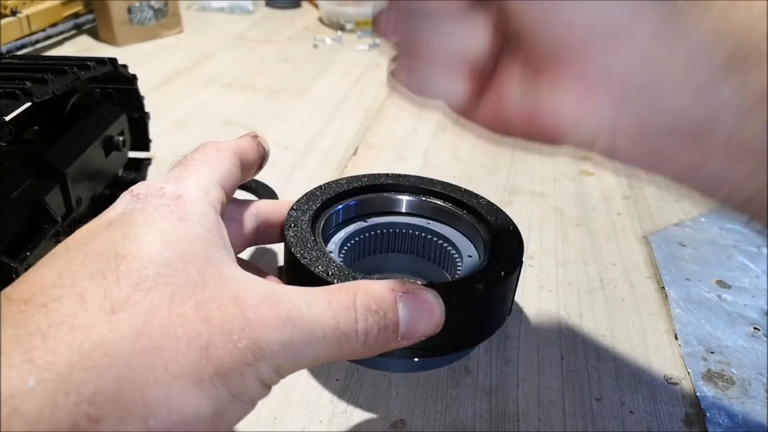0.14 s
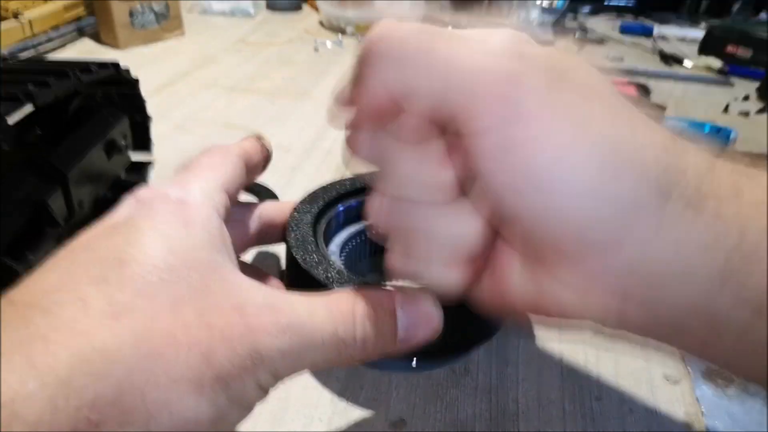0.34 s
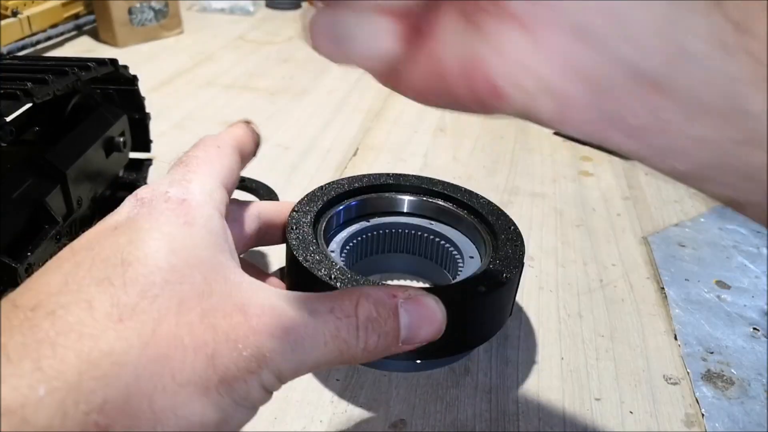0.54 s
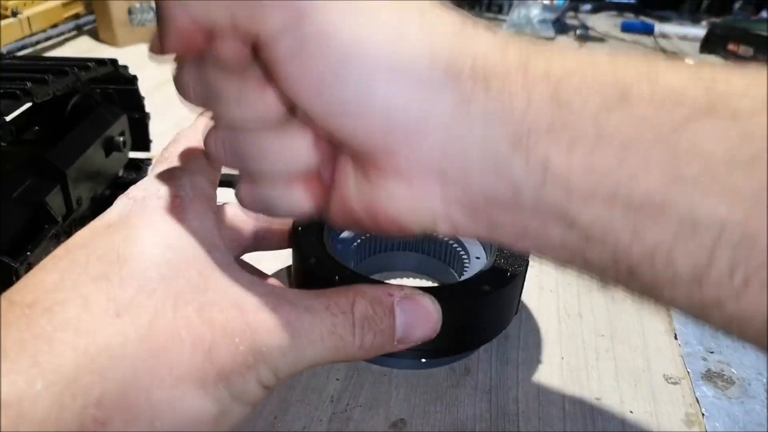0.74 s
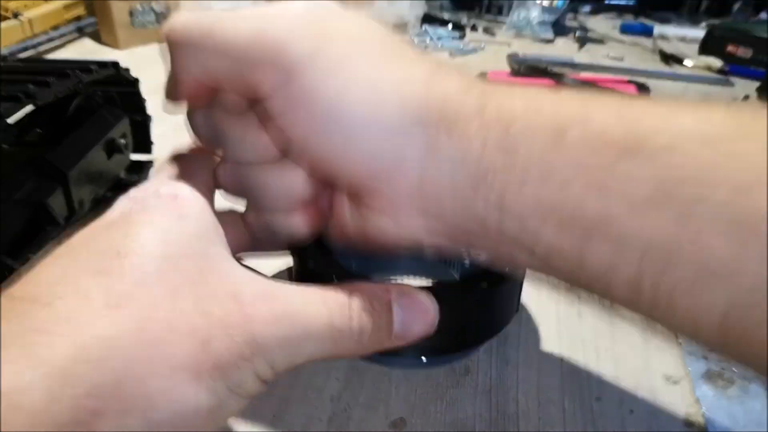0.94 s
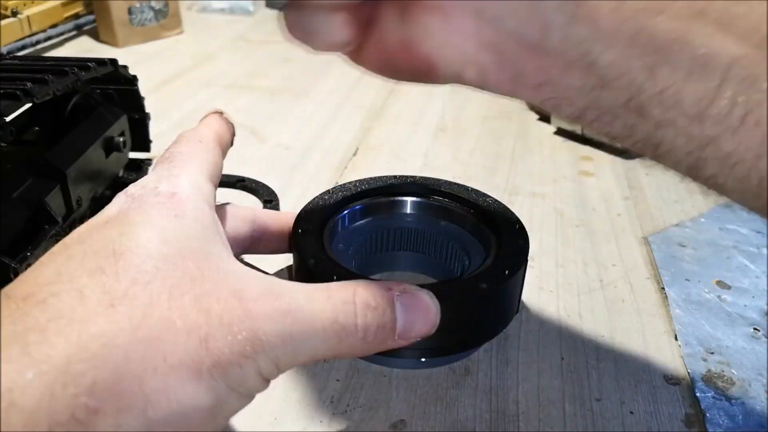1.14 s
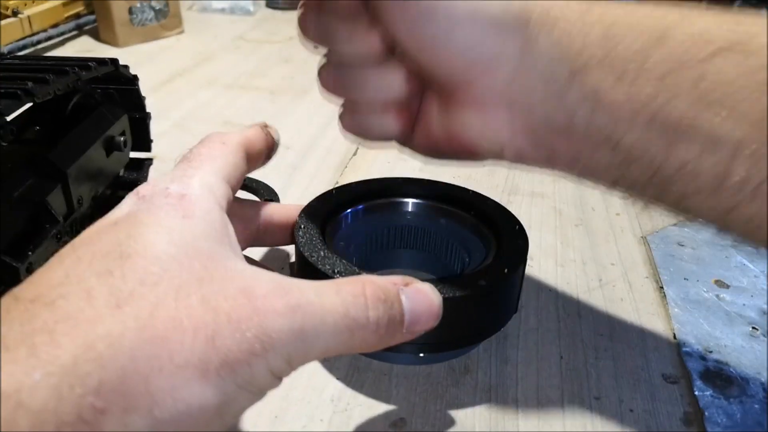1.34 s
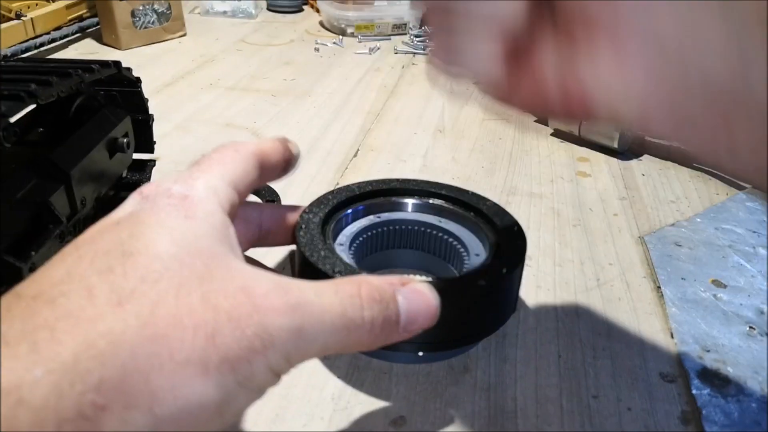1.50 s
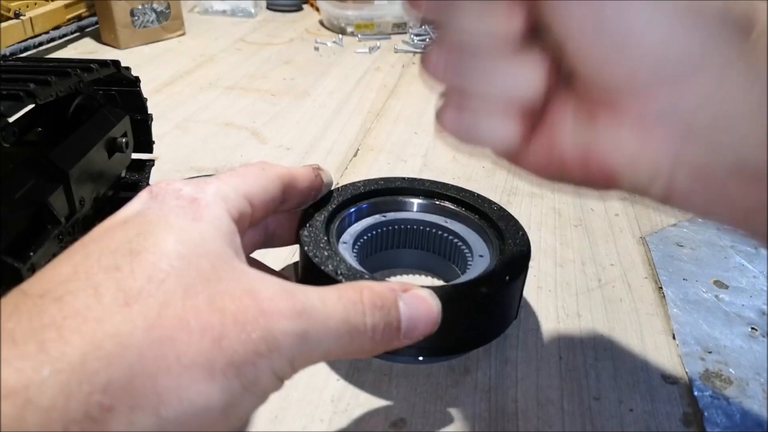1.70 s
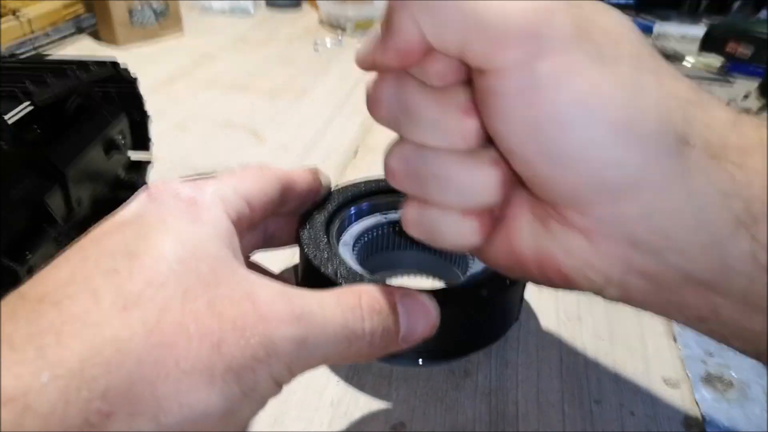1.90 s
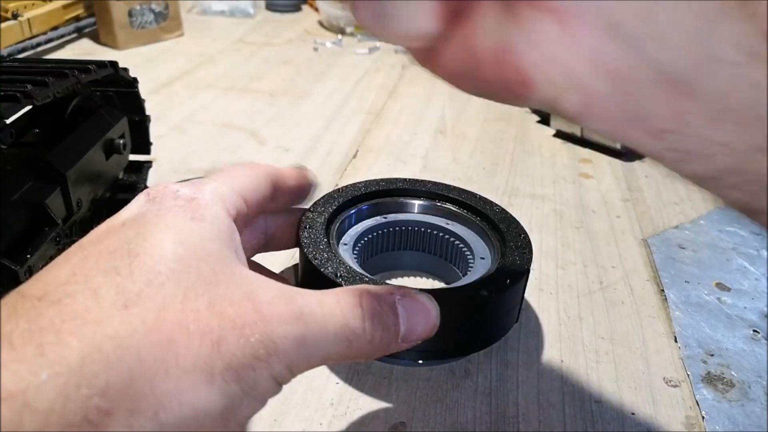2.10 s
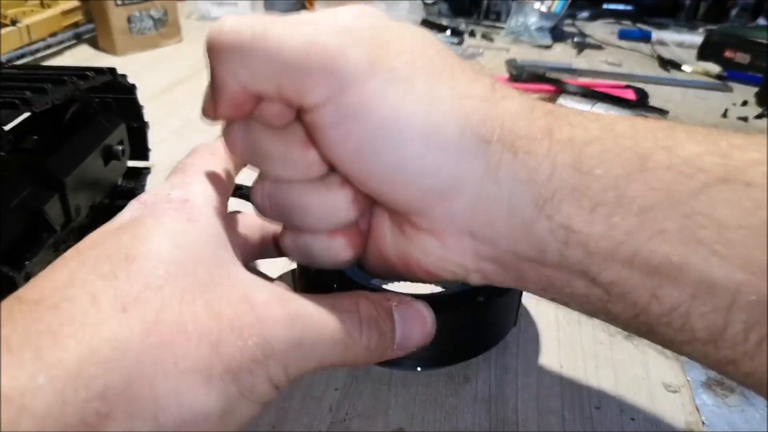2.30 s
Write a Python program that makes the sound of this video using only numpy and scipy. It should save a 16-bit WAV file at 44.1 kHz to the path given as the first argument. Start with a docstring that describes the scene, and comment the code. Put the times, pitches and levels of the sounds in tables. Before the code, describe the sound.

A fist hammers a hard plastic ring on a wooden workbench, seven evenly spaced blows, each a deep damped thump with a gritty crack and short metallic rattle, close stereo microphone in a small workshop.

```python
"""A fist pounds seven times on a hard plastic ring on a wooden workbench, heard close by in stereo.
Each blow drives the bench top: a damped low thump, short knocks and longer modes of the boards.
The tight parts slip with a crack, noise shaped by the ring's resonances; loose metal bits rattle and ring.
The bench sways on its legs as a slow sine, something rocking on it ticks, and a low hum and hiss go on.
A small workshop answers the blows and cracks with decaying noise."""
import sys
import numpy as np
from scipy import signal
from scipy.fft import rfft, irfft, next_fast_len
from scipy.io import wavfile
from scipy.ndimage import map_coordinates

SR = 44100
rng = np.random.default_rng(int(sys.argv[2]) if len(sys.argv) > 2 else 0)


def to_wav(s):
    """Save 16-bit WAV."""
    ch = np.atleast_2d(s).T  # columns
    pcm = np.round(np.clip(ch, -1, 1) * 32767)  # PCM
    wavfile.write(sys.argv[1], SR, pcm.astype(np.int16))


N = 103635
ALIKE = 0.16  # correlation of left and right in the cracks, rattles and scuffs


def amp(db):
    """Level to amplitude: 20 dB is a factor of ten."""
    return 10 ** (np.asarray(db) / 20)


def unit(x):
    """Scale to an RMS of one, so that a later gain sets the level."""
    return x / np.sqrt(np.mean(x ** 2) + 1e-20)


def along(points, hz):
    """Interpolate (f/Hz, value) points on a logarithmic frequency axis."""
    f, v = np.transpose(points)
    return np.interp(np.log(hz + 1), np.log(f + 1), v)


def curve(rows):
    """Interpolate (t/s, value) rows linearly to one value per sample."""
    return np.interp(np.arange(N) / SR, *np.transpose(rows))


def wobble(rate, size=N):
    """Slow random fluctuation: a spline through normal draws, rate knots per second."""
    knots = rng.standard_normal(int(size * rate / SR) + 4)
    return map_coordinates(knots, [np.arange(size) * rate / SR])


def filtered(x, response):
    """Linear filtering: multiply the spectrum by a response of frequency."""
    m = next_fast_len(x.shape[-1] + SR // 16)
    spectrum = rfft(x, m) * response(np.fft.rfftfreq(m, 1 / SR))
    return irfft(spectrum, m)[..., :x.shape[-1]]


def resonance(f, hz, width):
    """Driven damped oscillator: a causal band-pass of peak gain 1."""
    return 1j * f * width / (hz * hz - f * f + 1j * f * width)


def swell(t, rise, t60):
    """Envelope of a damped source: a rounded rise, then a fall of 60 dB in t60 seconds."""
    attack = np.sin(np.pi / 2 * np.clip(t / rise, 0, 1)) ** 2
    return attack * amp(-60 * np.maximum(t - rise, 0) / t60)


def pair(size, alike):
    """Partial coherence: two noises mixed from independent ones to the correlation alike."""
    a, b = rng.standard_normal((2, size))
    u = np.arccos(np.clip(alike, 0, 1)) / 2
    return np.array([np.cos(u) * a + np.sin(u) * b, np.cos(u) * a - np.sin(u) * b])


def add(track, x, s):
    """Superposition: mix x into track from time s."""
    i = round(s * SR)
    track[..., i:i + x.shape[-1]] += x[..., :N - i]


def room(x):
    """Diffuse reverberation: convolution with fresh noise whose bands decay at their own rates."""
    # reverberation time of the workshop: f/Hz, t60/s
    reverb_times = [(100, 0.49), (300, 0.25), (1000, .25), (2300, 0.34), (3500, 0.24), (5000, 0.27),
                    (10000, 0.19)]
    hz, t, z = signal.stft(rng.standard_normal((2, SR // 3)), SR, nperseg=256)
    decay = amp(-60 * t / along(reverb_times, hz)[:, None])
    tail = signal.istft(z * decay, SR, nperseg=256)[1]
    delayed = np.pad(x, ((0, 0), (250, 0)))  # samples before the first reflection
    return signal.fftconvolve(delayed, tail / np.linalg.norm(tail[0]), axes=1)


def background():
    """Slow oscillation and noise of changing level: the bench sways, a hum pulses with it, a hiss wavers."""
    # RMS level of the sway: t/s, level/dB
    sway_level = [(0.0, -57), (0.03, -38), (0.16, -70), (0.21, -39), (0.48, -43.5), (0.51, -38.5),
                  (0.74, -42), (0.86, -35), (0.98, -46.5), (1.11, -42.5), (1.99, -36.5), (2.02, -43.5),
                  (2.28, -33), (2.35, -65)]
    # level of the low hum before its pulsing and wavering: t/s, level/dB
    hum_level = [(0.0, -44.5), (0.2, -61.5), (0.4, -48), (0.56, -56), (0.74, -51), (0.88, -51),
                 (1.01, -49.5), (1.16, -52), (1.26, -45), (2.01, -48), (2.2, -45), (2.35, -52.5)]
    # level of the hiss before its wavering: t/s, level/dB
    hiss_level = [(0, -61), (.18, -65), (.3, -62), (.45, -64), (.65, -65), (.78, -66), (.95, -78),
                  (1.08, -78), (1.3, -68), (1.6, -67), (1.75, -70), (1.95, -68), (2.19, -63), (2.35, -72)]
    # relative spectral density of the hum: f/Hz, level/dB per Hz
    hum_spectrum = [(21, -26.5), (35, 1), (97, -20.5), (141, -16.5), (232, -24.5), (438, -33.5),
                    (500, -43.5), (650, -65), (1100, -120)]
    # relative spectral density of the hiss: f/Hz, level/dB per Hz
    hiss_spectrum = [(290, -49), (500, -4), (1670, -13.5), (2000, -4.5), (2870, -13.5), (4980, -16),
                     (5890, -15.5), (6200, -22), (7330, -18), (10800, -25), (14000, -70.5), (22000, -120)]
    sway_hz, pulse_db = 22.3, 3.5  # mean sway rate; swing of the hum level to either side
    sway = np.sin(2 * np.pi * np.cumsum(sway_hz + 1.5 * wobble(5)) / SR)
    hum = unit(filtered(pair(N, 0.9), lambda f: amp(along(hum_spectrum, f))))
    hiss = unit(filtered(pair(N, 0.15), lambda f: amp(along(hiss_spectrum, f))))
    swaying = np.sqrt(2) * amp(curve(sway_level)) * sway
    humming = amp(curve(hum_level) + pulse_db * sway + 1.7 * wobble(9.6)) * hum
    hissing = amp(curve(hiss_level) + 2.6 * wobble(8.5)) * hiss
    return swaying + humming + hissing


def ticks():
    """Light impacts of something rocking on the bench: a damped tone and a band of scuffing noise."""
    # touches: onset t/s, tone level/dB
    touches = [(.062, -65), (.328, -60), (.377, -62), (.58, -56), (.631, -58), (.683, -62), (.74, -65),
               (.952, -58), (1.0, -64), (1.053, -63), (1.235, -56), (1.287, -62), (1.342, -64),
               (1.537, -59), (1.585, -62), (1.639, -65), (1.877, -60), (1.925, -63), (2.167, -59),
               (2.216, -62), (2.266, -64)]
    tone_hz, t60 = 745, 0.07  # Hz, s
    scuff_hz, scuff_db = 2100, -6  # Hz, dB relative to the tone's amplitude
    out, t = np.zeros((2, N)), np.arange(SR // 8) / SR
    for s, db in touches:
        tone = np.sin(2 * np.pi * (tone_hz * t + rng.random((2, 1))))
        scuff = unit(filtered(pair(len(t), ALIKE), lambda f: resonance(f, scuff_hz, 1100) ** 2))
        add(out, amp(db) * swell(t, 0.013, t60) * (tone + amp(scuff_db) * scuff), s)
    return out


def bench():
    """Impulsive excitation of damped modes: a push gives a deep thump, two knocks and ringing boards."""
    # contacts: onset t/s, thump level/dB, thump f/Hz, knock level/dB, knock f/Hz,
    # upper knock level/dB, rise of the knocks and boards t/s, knock t60/s
    contacts = [(0.1969, -14.5, 54, -1.5, 199.8, -25.5, .0075, 0.026),
                (0.504, -5.5, 58, -15, 167, -17, 0.0087, .04),
                (0.8212, -12.5, 36, -37.5, 200, -42, 0.0066, .04),
                (0.8251, -23, 50, -11.5, 218, -28.5, 0.00836, 0.041),
                (1.107, -10, 52.9, -3.5, 208.6, -23, .007, 0.032),
                (1.406, -11, 54.4, -7.5, 208, -22, .0065, 0.026),
                (1.743, -6.5, 55, -2.5, 196.9, -19, 0.0067, 0.028),
                (2.0365, -3, 62, -16, 225, -11.5, 0.0093, 0.054),
                (2.078, -27, 90.3, -26.5, 201.3, -35.5, 0.0036, 0.19),
                (.523, -28.5, 100, -13, 131.3, -22, 0.003, 0.048),
                (1.432, -38.5, 61, -17.5, 200, -26, 0.0072, 0.02),
                (1.7815, -40, 60, -22, 290, -20, .003, .04), (2.064, -49.5, 60, -21, 280, -21, .003, 0.054),
                (0.949, -35.5, 100, -47, 293, -42, 0.0091, .08)]
    # board modes: f/Hz, mean level/dB relative to the stronger knock, t60/s
    board_modes = [(156.7, -29.5, 0.3), (201.4, -23, 0.15), (238.9, -24, 0.19), (286, -30, 0.26),
                   (359.3, -36, .25), (423.6, -42, 0.13)]
    thump_rise, thump_t60 = 0.0036, 0.097  # s
    upper_hz, upper_t60 = 331.1, 0.022  # Hz, s
    knock_lag = 0.0028  # s, the knock follows the push
    left_lead = 0.00031  # s, left ahead of right
    room_db = -15.5
    out, t = np.zeros((2, N)), np.arange(SR // 3) / SR
    late = np.maximum(t - knock_lag, 0)

    def mode(db, hz, rise, t60):
        """Damped oscillation of one mode, its first swing downward."""
        return -amp(db) * swell(late, rise, t60) * np.sin(2 * np.pi * hz * late)

    for s, thump_db, thump_hz, knock_db, knock_hz, upper_db, rise, knock_t60 in contacts:
        thump = -amp(thump_db) * swell(t, thump_rise, thump_t60) * np.cos(2 * np.pi * thump_hz * t)
        knock = mode(knock_db, knock_hz, rise, knock_t60) + mode(upper_db, upper_hz, rise, upper_t60)
        stronger_db = max(knock_db, upper_db)
        boards = sum(mode(stronger_db + db + rng.normal(0, 1.43), hz, rise, t60)
                     for hz, db, t60 in board_modes)
        blow = thump + knock + boards
        wet = room(blow[None])
        add(out, blow, s)
        # low reverberation is mostly common to both sides
        add(out, amp(room_db) * (1.12 * wet[0] + 0.27 * wet), s)
    side = np.array([[1], [-1]])
    return filtered(out, lambda hz: np.exp(np.pi * 1j * hz * left_lead * side))


def slips():
    """Frictional slip: gritty noise excites the ring's resonances, then loose bits rattle and metal rings."""
    # slips: peak t/s, crack level/dB, rise t/s, crack t60/s, tilt/dB per octave,
    # left minus right level/dB, rattle level/dB, ringing tone f/Hz, tone level/dB relative to the crack gain
    slip_events = [(0.2029, -20.5, 0.0034, .05, -1, -1.5, -65, 3000, 1),
                   (0.2064, -13.5, .003, 0.011, 6, 3, -32.5, 2800, 3.5),
                   (0.512, -23, 0.0064, .04, -3.5, 2, -65, 3927, 0),
                   (.515, -17, .003, 0.03, -3, -0.5, -36, 1637, 5.5),
                   (.524, -31.5, 0.0035, 0.03, -1, 4.5, -55, 2170, -3),
                   (.541, -35, .004, 0.044, -1, 2, -54.5, 2800, -17.5),
                   (.831, -30.5, 0.0057, 0.036, -3.5, 2, -63, 1524, 3),
                   (0.8366, -14.5, 0.0035, 0.023, -4, -0.5, -36, 1620, -3.5),
                   (.928, -39, .0015, .02, 7, 2, -63, 4900, -10),
                   (1.112, -24.5, .004, 0.036, 0.5, -3, -49, 1674, 0),
                   (1.1147, -13, .003, 0.019, 0.5, 0.5, -38, 2580, 0.5),
                   (1.146, -33, 0.0022, 0.023, 0, 4, -71, 2690, 0),
                   (1.411, -26, 0.0039, 0.023, -2, 5, -65.5, 2070, -0.5),
                   (1.4137, -8.5, .002, 0.019, 1, 3.5, -30.5, 2656, 1),
                   (1.748, -21, 0.0043, 0.091, -3.5, 2, -58, 1066, 1.5),
                   (1.751, -10.5, 0.0029, 0.015, 1, 3.5, -31.5, 2005, 1.5),
                   (2.045, -23, 0.0094, 0.037, -3.5, 4.5, -32, 1030, 11),
                   (2.058, -27, 0.0089, 0.15, 5, 3.5, -31.5, 2740, -3.5),
                   (2.068, -25, 0.0022, 0.017, 0, -8, -60, 1004, 1),
                   (2.075, -32, .003, 0.15, 0.5, 6.5, -53.5, 2070, 8)]
    # resonances of the plastic ring: f/Hz, width/Hz, level/dB
    plastic_modes = [(574, 230, -1), (1019, 153, 4.5), (1288, 135, 2), (1848, 330, 1), (2906, 416, -2),
                     (4114, 570, -9), (5556, 730, -9), (7610, 1170, -12), (9030, 1900, -16.5)]
    # relative spectral density of the rattling bits: f/Hz, level/dB per Hz
    rattle_spectrum = [(240, -36.5), (400, 5.5), (675, -12.5), (902, -8), (1520, -9.5), (1870, -8.5),
                       (2610, -5.5), (5050, -21), (7950, -22), (10800, -26.5), (14000, -65.5),
                       (22000, -120)]
    # metal modes: f/Hz, mean level/dB before the metal gain, t60/s
    metal_modes = [(2280, -6.5, 0.29), (3650, 3.5, 0.06), (3620, -15.5, 0.37), (4010, 12.5, 0.05),
                   (6240, -0.5, 0.23), (7407, -17, 0.2), (7784, -11.5, 0.29)]
    rattle_t60, rattle_grain_db = 0.24, 1  # s, dB
    metal_db, room_db = -18, -13  # metal relative to the rattle gain; reverberation of the crack
    tone_t60 = 0.024  # s, an extra decay: the tone dies faster than the grit
    out, t = np.zeros((2, N)), np.arange(SR // 4) / SR

    def body(f):
        """Modal sum of the plastic ring, neighbours in opposite phase."""
        return sum((-1) ** k * amp(db) * resonance(f, hz, width)
                   for k, (hz, width, db) in enumerate(plastic_modes))

    def sine(hz):
        """Pure tone with an independent random phase on each side."""
        return np.sin(2 * np.pi * (hz * t + rng.random((2, 1))))

    for s, db, rise, t60, tilt_db, pan_db, rattle_db, tone_hz, tone_db in slip_events:
        grit = pair(len(t), ALIKE) * amp(4.4 * wobble(674, size=len(t)))
        crack = unit(filtered(grit, lambda f: body(f) * amp(tilt_db * np.log2((f + 100) / 2000))))
        tone = amp(tone_db - 60 * t / tone_t60) * sine(tone_hz)
        shape = swell(t, rise, t60) * amp([[db + pan_db / 2], [db - pan_db / 2]])

        grain = amp(rattle_grain_db * wobble(150, size=len(t)))
        noise = filtered(pair(len(t), ALIKE), lambda f: amp(along(rattle_spectrum, f)))
        bits = unit(noise * grain) * swell(t, rise + 0.0043, rattle_t60)
        metal = sum(amp(level - 60 * t / decay + rng.normal(0, 1.5, (2, 1))) * sine(hz)
                    for hz, level, decay in metal_modes)
        rattle = amp(rattle_db) * (bits + amp(metal_db) * metal * (t > rise))

        add(out, (crack + tone) * shape + rattle, s - rise)
        add(out, amp(room_db) * room((crack * shape)[:, :SR // 8]), s - rise)
    return out


def scene():
    """Superposition of all sources at the listening point."""
    return background() + ticks() + bench() + slips()


def record(dry):
    """Transduction: unequal treble response, self-noise, soft saturation, then a sharp low-pass."""
    # treble response of both sides: f/Hz, level/dB
    treble = [(9300, -0.5), (10500, -9), (12000, -7.5), (15000, -12.5)]
    # brighter left side: f/Hz, left minus right level/dB
    left_louder = [(300, 0), (2000, 0), (5800, 2), (10000, 1.5)]
    self_noise_db, top_hz = -79, 15400
    half = np.array([[0.5], [-0.5]])
    x = filtered(dry, lambda hz: amp(along(treble, hz) + along(left_louder, hz) * half))
    x = x + amp(self_noise_db) * rng.standard_normal(x.shape)
    x = x / (1 + np.abs(x) ** 6) ** (1 / 6)  # peaks saturate towards 1
    return filtered(x, lambda hz: hz < top_hz)


dry = scene()
out = record(dry)
to_wav(out)
```